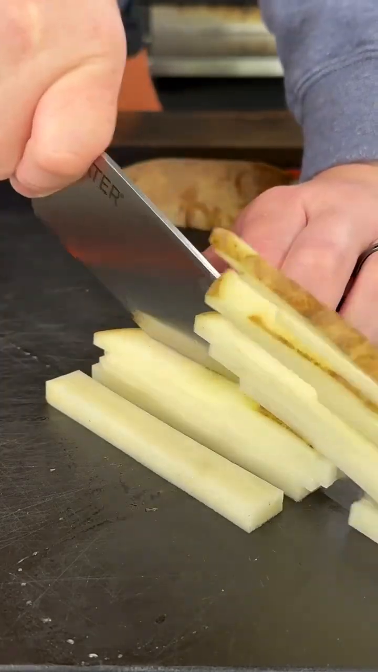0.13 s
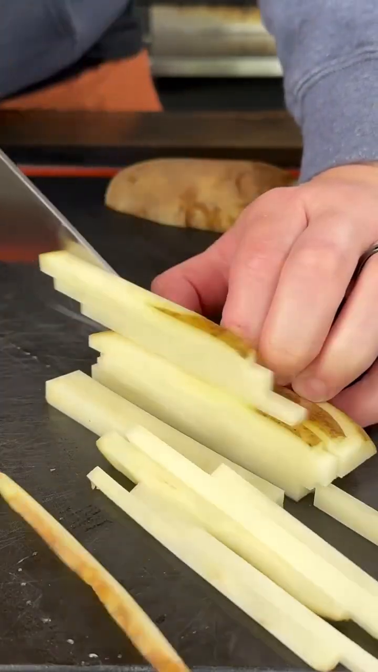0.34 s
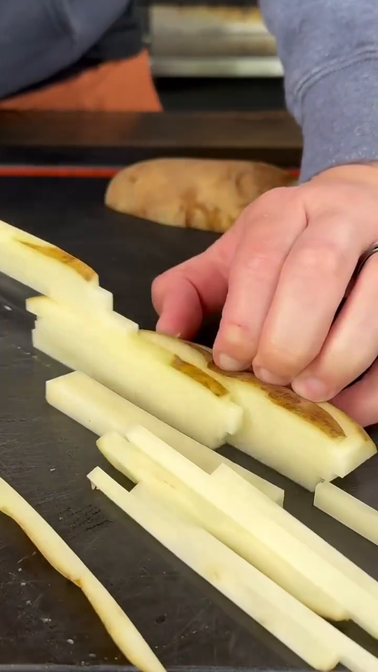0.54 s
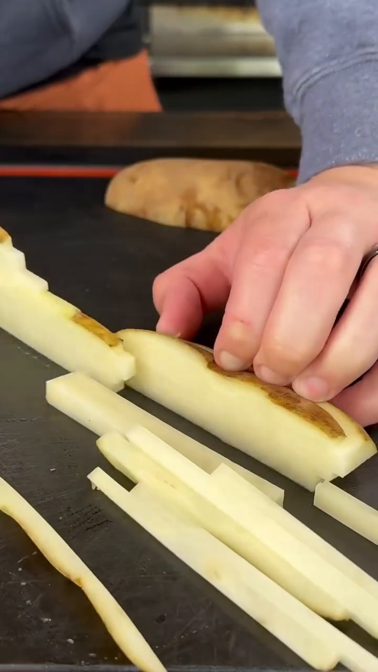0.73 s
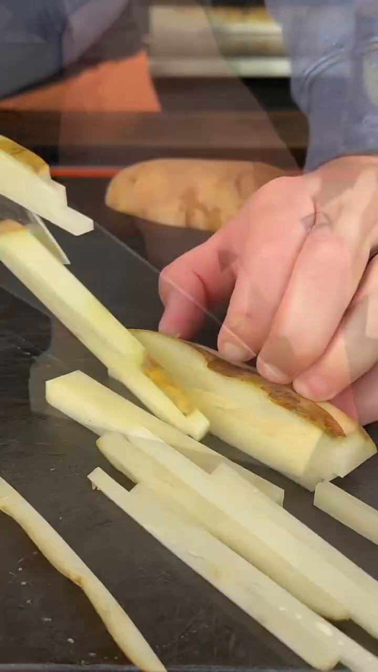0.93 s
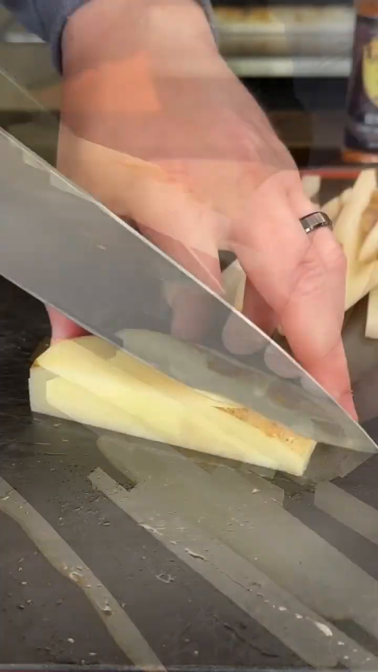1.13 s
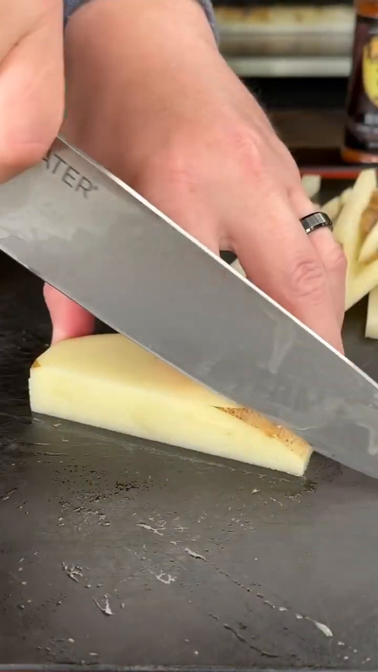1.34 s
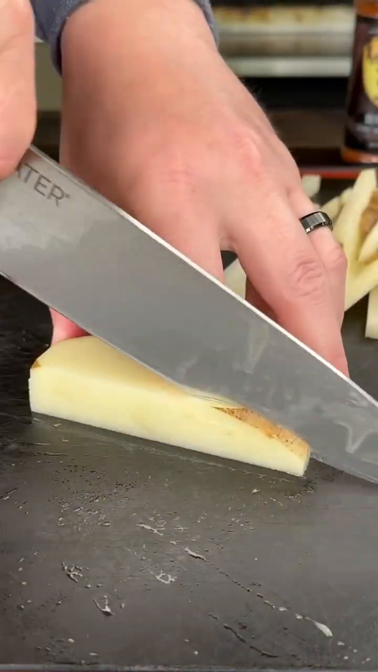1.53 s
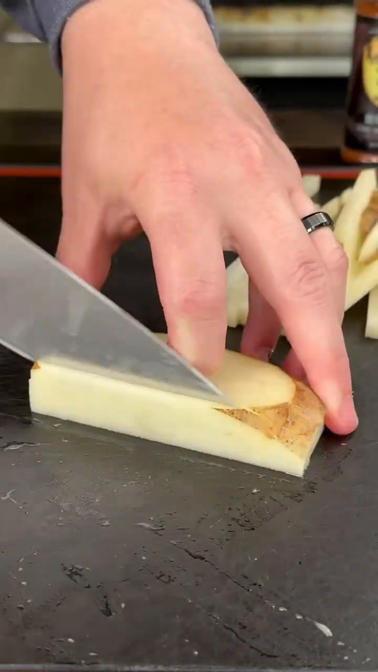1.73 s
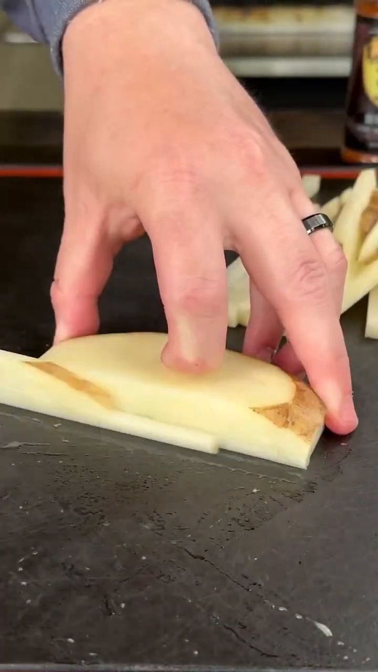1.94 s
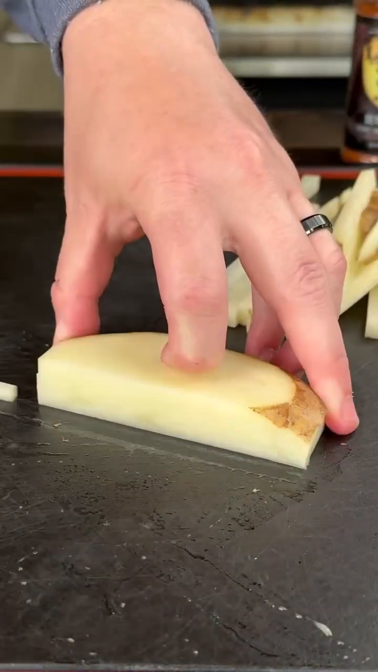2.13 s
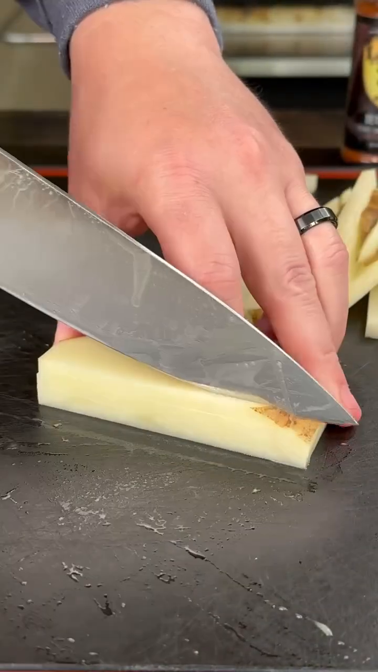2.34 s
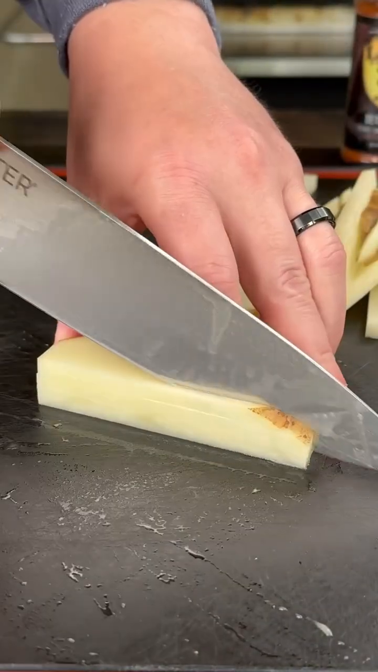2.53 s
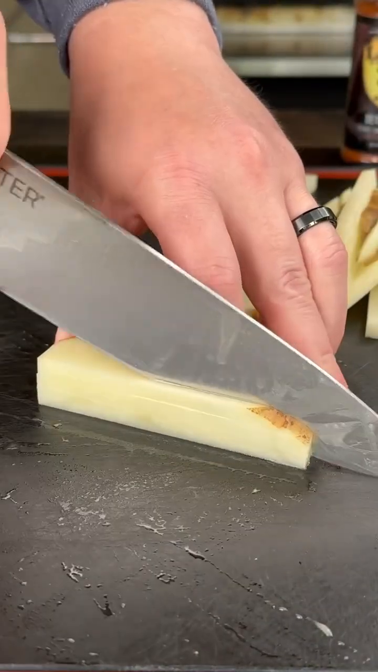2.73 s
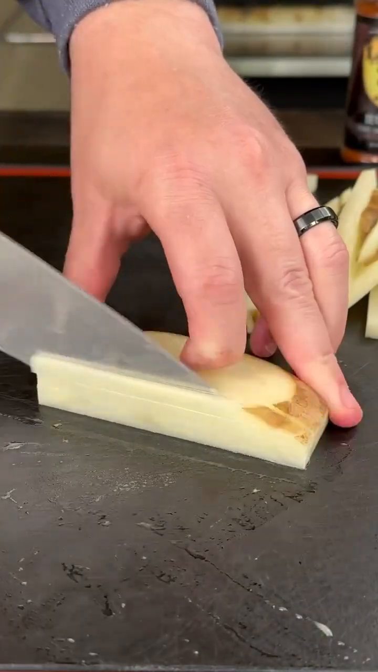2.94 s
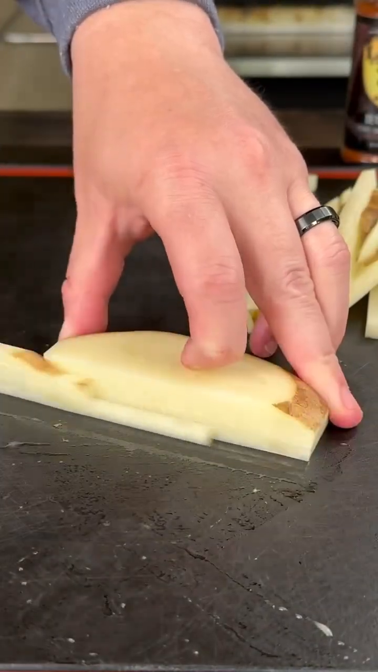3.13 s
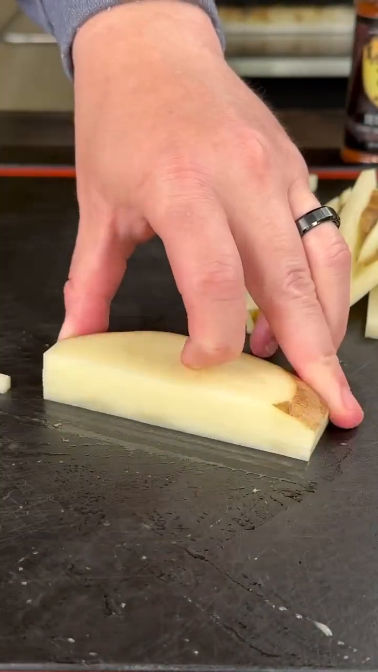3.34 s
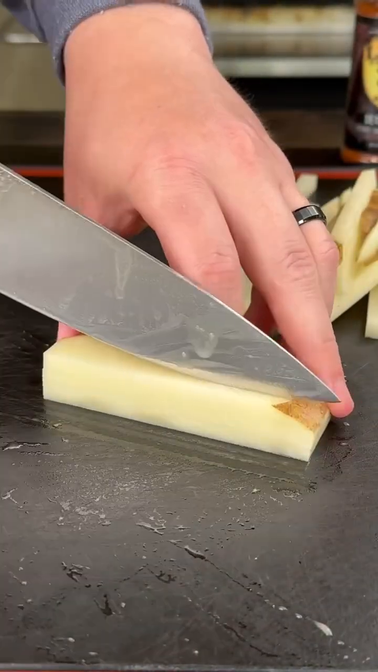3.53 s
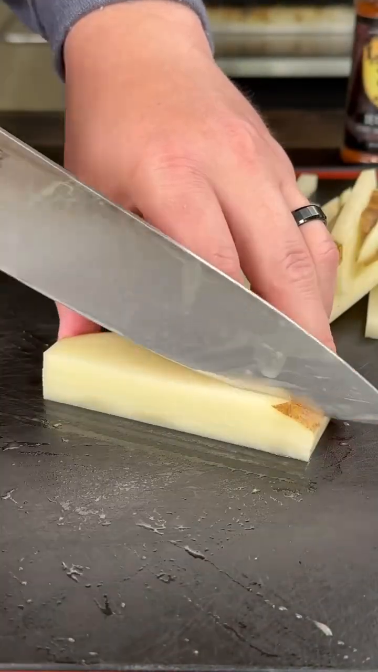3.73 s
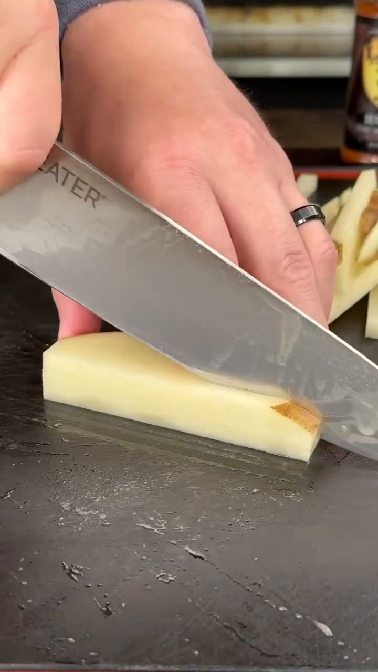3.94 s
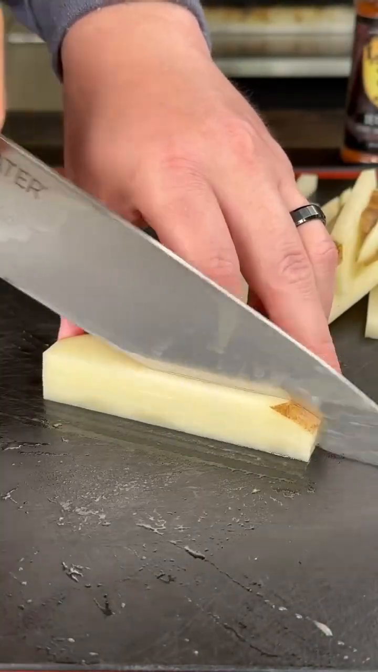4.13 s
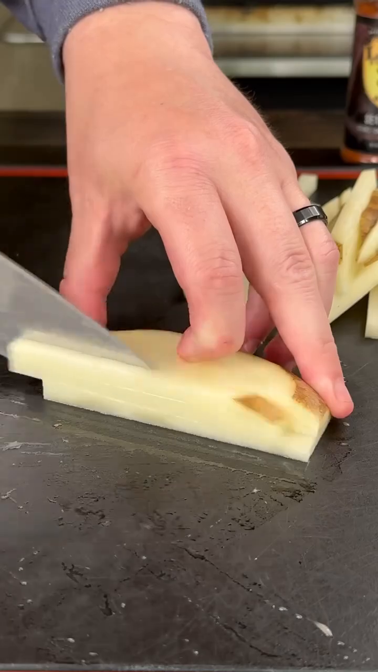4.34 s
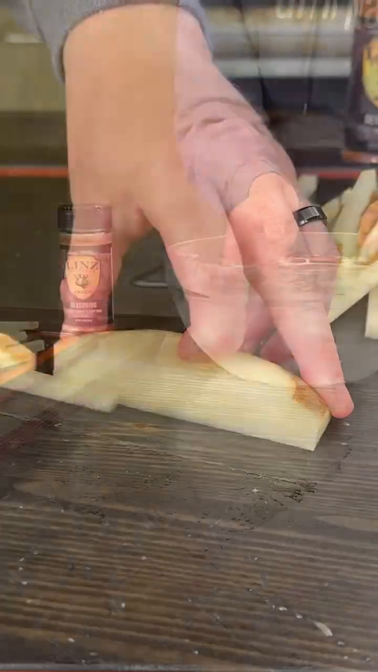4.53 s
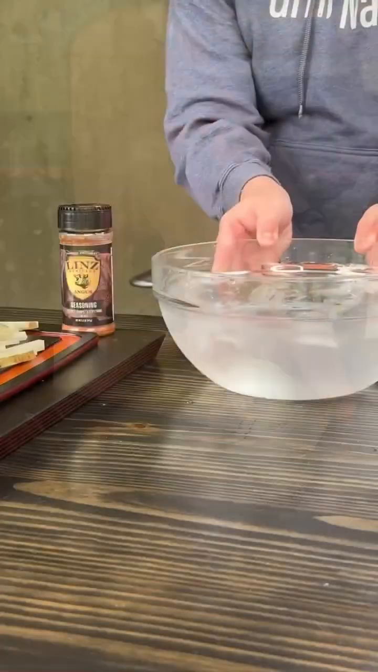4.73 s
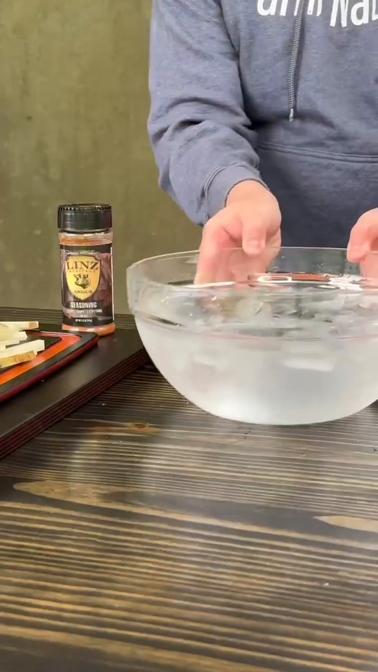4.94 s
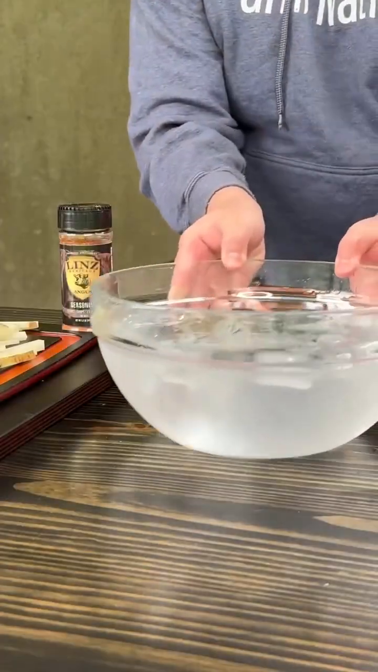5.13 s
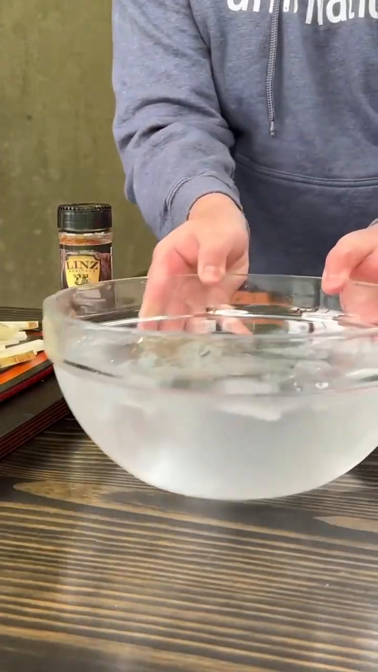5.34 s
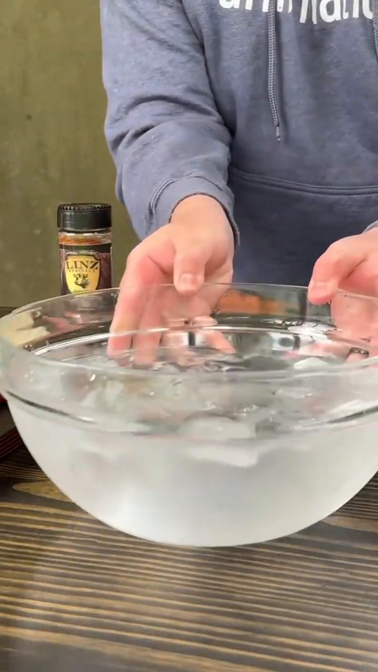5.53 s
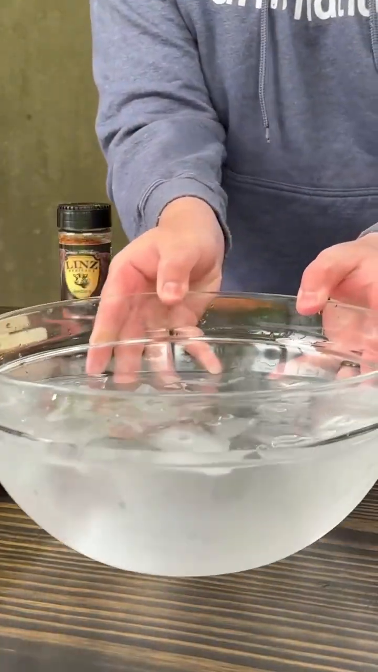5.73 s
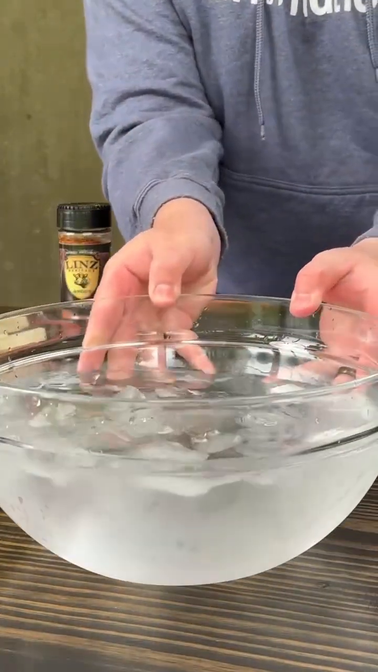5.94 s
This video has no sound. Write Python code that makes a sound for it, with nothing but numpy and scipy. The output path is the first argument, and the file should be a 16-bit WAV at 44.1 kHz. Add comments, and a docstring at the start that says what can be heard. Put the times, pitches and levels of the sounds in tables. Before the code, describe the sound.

Close, nearly centred sound outdoors over a soft low rumble. A large knife draws through raw potato in wet, crisp hissing strokes, its edge knocking hard on a plastic board, the blade faintly singing late in the later strokes. Small birds whistle and trill in the distance. Then a heavy glass bowl is pushed over a wooden table with gritty scraping, low groans, judder, bumps and a faint hoarse squeal.

```python
"""A chef's knife hisses through a raw potato, wet grains tearing over a low rumble of filtered noise outdoors.
The edge knocks on a plastic board: damped sine modes, thuds and noise clicks. Late in each stroke the blade sings.
Small birds call far off: gliding sines and a trill of upward flicks. Then a glass bowl of ice water is
pushed across a wooden table: gritty scrape, rubbed resonances, groan, judder, bumps, clinks and a squeal."""
import sys
import numpy as np
from scipy import signal
from scipy.fft import rfft, irfft, next_fast_len
from scipy.io import wavfile
from scipy.ndimage import uniform_filter1d, map_coordinates

SR = 44100
rng = np.random.default_rng(int(sys.argv[2]) if len(sys.argv) > 2 else 0)


def bounce(signal):
    """Save signal as a 16-bit WAV file at the path given by the first command-line argument."""
    frames = np.transpose(np.atleast_2d(signal))
    limited = np.clip(frames, -1, 1)
    pcm = np.round(limited * 32767).astype(np.int16)
    wavfile.write(sys.argv[1], SR, pcm)


N = 268125
TIME = np.arange(N) / SR
TOUCH_TIME = TIME[:SR // 4]   # time base of one touch

# Levels in the tables are relative: the mix adds its own gains.
# Outdoor rumble and air: (frequency [Hz], density [dB/Hz])
OUTDOOR_SPECTRUM = [(13, -26), (22, -3.5), (76, 4.5), (345, -15), (481, -21.5), (857, -20), (1070, -20.5),
                    (1490, -24.5), (2070, -28), (2440, -24), (3210, -34.5), (4860, -40), (5570, -38.5),
                    (11100, -46), (15900, -51)]
OUTDOOR_DB = -48.5

# Blade drawn through potato: (start [s], end [s], tearing [dB], juice fizz [dB],
# place of fizz peak [0-1], blade singing [dB])
SLICE_STROKES = [(0.051, 0.748, -46, -49.5, 0.28, -61), (1.498, 2.232, -46.5, -49, 0.44, -57.5),
                 (2.707, 3.396, -46.5, -50.5, 0.43, -47), (4.04, 4.755, -46.5, -48.5, 0.4, -45.5)]
SLICE_ATTACK_S, SLICE_RELEASE_S = 0.098, 0.12
TEAR_RISE_DB = 2   # over a stroke, as the flesh grips harder
FIZZ_LOSS_DB = 7.5   # half a stroke from its peak
# Edge set on the potato and pressed in, or sliding clear: (start [s], end [s], level [dB], juice fizz [dB])
LIGHT_CONTACTS = [(-.03, 0.066, -44.5, -73), (0.883, 1.098, -52, -64), (1.065, 1.413, -52, -59.5),
                  (2.18, 2.272, -45, -57), (2.32, 2.609, -54, -57), (2.688, 2.746, -68, -50),
                  (3.323, 3.43, -43.5, -55), (3.41, 3.64, -89, -75), (3.653, 3.99, -65, -59.5)]
PRESS_ATTACK_S, PRESS_RELEASE_S, PRESS_RISE_DB, PRESS_DRAG_DB = 0.03, 0.053, 7.5, -2
# Drag on the flat of the blade: (level [dB], place of peak [0-1], loss half a stroke away [dB])
BLADE_DRAG = (-2.5, 0.29, 11)
# Wet flesh parting: (frequency [Hz], density [dB/Hz])
FLESH_SPECTRUM = [(210, -63), (350, -9), (417, -12), (593, -3), (741, -6.5), (880, -1), (1160, -6.5),
                  (1700, 2.5), (2660, 4), (3540, -4.5), (4150, 1.5), (4900, -6.5), (5700, -4),
                  (9830, -10.5), (11700, -6), (15900, -15)]
# Rubbed blade resonances: (frequency [Hz], width [Hz], level [dB], place of peak in stroke [0-1])
BLADE_RESONANCES = [(1720, 110, -4, .6), (2210, 160, -8.5, .7), (2726, 99, -2.5, .69),
                    (4016, 140, -0.5, 0.8), (5520, 260, -11, .72)]
BLADE_GLIDE_PER_STROKE, SING_SPAN_STROKES = 0.2, 0.086   # fraction of pitch, fraction of stroke
# Passing resonances of a moving contact: size and pace
SHIFT_WIDTH_HZ, SHIFTS_PER_S = 248.2, 7

# Bird notes: (time [s], length [s], first pitch [Hz], last pitch [Hz], arch [Hz], level [dB])
BIRD_NOTES = [(0.036, 0.062, 3720, 3670, -7, -45.5), (0.9, 0.059, 2395, 2430, 0, -56),
              (0.924, 0.097, 3050, 3330, -130, -53), (1.247, 0.36, 2700, 2480, -59.5, -61.5),
              (1.803, .04, 3040, 3200, 0, -50), (1.877, 0.064, 3350, 2990, 0, -48),
              (2.247, 0.051, 3164, 2730, 58, -46), (2.578, 0.1, 3350, 3000, -58, -51),
              (2.678, 0.049, 2640, 2510, 40, -51), (3.39, 0.079, 2830, 2830, 3, -58),
              (5.712, 0.12, 5650, 5700, 523, -65), (5.959, 0.11, 5600, 5280, 564, -63.5)]
# Trill: quick upward flicks, each held at its top, sinking a little in pitch
TRILL_START_S, TRILL_PERIOD_S, TRILL_LENGTH_S, TRILL_DB = 0.772, 0.0752, 0.495, -57
TRILL_TOP_HZ, TRILL_SAG_HZ_PER_S = 4920, 380
FLICK_S, FLICK_DEPTH = 0.021, 0.24   # depth as a fraction of pitch
WAVER_HZ, WAVER_DEPTH = 220, 0.76

# Edge meets board: (time [s], level [dB], knock reference pitch [Hz], first tick [dB],
# delay until full edge lands [s], hardness [dB/octave], ring length factor, thud [dB])
BOARD_CHOPS = [(0.275, -15, 1270, -5.5, 0.0027, 5, 1, -8.5),
               (1.003, -28.5, 640, -3.5, 0.0027, -6.5, 0.43, -7),
               (1.3115, -16.5, 590, -8, 0.00282, 4, 0.42, -6.5),
               (2.178, -13.5, 770, -9.5, 0.00171, 2, 0.55, -8.5),
               (2.566, -17, 625, -2.5, 0.0034, -0.5, 0.4, -7.5),
               (2.712, -33, 729, -10, 0.0027, 2, 0.67, -1),
               (2.7408, -23.5, 620, -6, 0.00268, -1, 0.51, -6.5),
               (3.34, -33, 1190, -7.5, 0.00176, 2.5, 0.38, -11),
               (3.949, -13, 662, -5.5, 0.0025, 5.5, 0.61, -5)]
# Board with the knife on it: (frequency [Hz], level [dB], t60 [s])
BOARD_MODES = [(253, -8.5, 0.068), (488, 3, 0.048), (616, 2.5, 0.058), (968, 4, 0.019), (1106, -4.5, 0.032),
               (1330, -6.5, 0.037), (1805, -0.5, 0.023), (2200, -7, 0.03), (2700, -13.5, 0.044),
               (3350, -12, 0.015), (4150, -13, 0.019), (6630, -21.5, 0.007)]
KNOCK_UNEVEN_DB = 1.8
THUD_RATIO, THUD_T60_S = 0.943, 0.019   # thud pitch / knock reference pitch
# Board rebounding on the table: (frequency [Hz], level [dB], t60 [s])
REBOUND_MODES = [(212.5, -4.5, 0.14), (305, 0, 0.076), (437, 5.5, .06), (550, -2, .05)]
REBOUND_DELAY_S, REBOUND_DB = 0.00785, -21

# Sliding speed of the bowl as scrape level: (time [s], level [dB])
SLIDE_CURVE = [(4.45, -55), (4.62, -42.5), (4.78, -42.5), (5.06, -36.5), (5.38, -37.5), (5.62, -44.5),
               (5.77, -50), (5.87, -66), (6.08, -69)]
# Grit under the glass foot: (frequency [Hz], density [dB/Hz])
SCRAPE_SPECTRUM = [(240, -24.5), (400, -2), (665, -9.5), (707, -7.5), (1000, -4), (1440, -10),
                   (1620, -18.5), (2240, -8.5), (4160, -31), (4770, -27.5), (6800, -35.5), (15900, -38)]
# Rubbed glass bowl: (frequency [Hz], width [Hz], level [dB])
BOWL_RESONANCES = [(662.5, 9.8, -4.5), (1440, 30, -12.5), (1750, 57, -9.5), (2198, 27, -9),
                   (2610, 200, -12.5), (3030, 280, -10), (4130, 47, -17.5), (6930, 290, -23.5)]
# Foot chatters, table groans: (middle [s], length [s], level [dB])
GROAN_SPELLS = [(4.53, 0.25, -35), (4.633, 0.084, -22), (4.701, 0.096, -20), (4.812, 0.27, -33),
                (4.986, 0.15, -32.5), (5.102, 0.31, -24), (5.259, 0.1, -25), (5.549, 0.097, -21),
                (5.682, 0.23, -30.5), (5.796, 0.1, -28.5), (5.859, 0.021, -33.5), (5.971, 0.062, -31),
                (6.067, 0.11, -31.5)]
GROAN_UNDER_SLIDE_DB = -3   # table hum that follows the scrape
# Table groan: (frequency [Hz], density [dB/Hz])
GROAN_SPECTRUM = [(76, -46), (130, -12.5), (216, 0), (259, -16), (360, -11.5), (416, -17.5), (666, -26.5),
                  (700, -38), (910, -83), (1540, -120)]
# Table judder level: (time [s], level [dB])
JUDDER_CURVE = [(4.42, -55), (4.5, -32.5), (4.76, -38.5), (5.0, -33.5), (5.22, -41), (5.49, -38.5),
                (5.56, -27), (5.83, -19.5), (6.08, -26.5)]
# Table judder: (frequency [Hz], density [dB/Hz])
JUDDER_SPECTRUM = [(15, -57), (25, -23), (49, -8), (70, -10.5), (102, 0), (167, -13), (220, -12.5),
                   (290, -48), (480, -120)]
# Bowl catches on the grain: (time [s], level [dB])
BOWL_BUMPS = [(4.474, -34.5), (4.606, -29), (4.689, -31), (4.969, -29), (5.442, -29.5), (5.526, -18),
              (5.549, -21), (5.647, -26), (5.849, -21.5), (5.893, -31.5), (6.025, -13.5)]
# Table top: (frequency [Hz], level [dB], t60 [s])
TABLE_MODES = [(108, 6, 0.18), (222, 17, 0.033), (312, -0.5, 0.054), (360.5, 5.5, 0.051), (458, 0.5, 0.029),
               (580, -0.5, 0.055)]
TAP_DB, TAP_T60_S = -19.5, 0.027   # hard glass foot taps as it catches
# Hoarse squeal of the slowing foot: (start [s], end [s], level [dB], place of peak [0-1],
# loss half its length away [dB])
FOOT_SQUEAL = (5.5, 5.98, -44.5, .2, 18)
SQUEAL_HZ, SQUEAL_WIDTH_HZ = 2850, 250
# Glass jolted into ringing: (time [s], level [dB])
GLASS_CLINKS = [(5.527, -51.5), (6.026, -59)]
# Glass ring: (frequency [Hz], level [dB], t60 [s])
GLASS_MODES = [(1530, -5, 0.61), (2340, -17, .5), (2850, -10.5, .6)]

# Bands where the two sides differ: (low [Hz], high [Hz], difference [dB])
SIDE_BANDS = [(30, 150, -36.5), (414, 920, -8.5), (6310, 7900, -2.5), (13420, 13800, 1.5)]
CUTOFF_HZ = 15900


def from_db(db):
    """Decibels to gain."""
    return 10 ** (np.asarray(db) / 20)


def rms_one(x):
    """Scale to unit power."""
    return x / np.sqrt(np.mean(x ** 2) + 1e-20)


def cut(x, hz, kind, order=2):
    """Butterworth filter."""
    sos = signal.butter(order, np.clip(hz, 10, 0.45 * SR), kind, fs=SR, output="sos")
    return signal.sosfilt(sos, x + 1e-18)


def colour(x, spectrum):
    """Shape a steady excitation to a spectrum, falling 36 dB/octave beyond its ends; rms 1."""
    hz, db = np.transpose(spectrum)
    size = next_fast_len(N)
    f = np.maximum(np.fft.rfftfreq(size, 1 / SR), 1)
    octaves_beyond = np.abs(np.log2(f / np.clip(f, hz[0], hz[-1])))
    gain = from_db(np.interp(np.log(f), np.log(hz), db) - 36 * octaves_beyond)
    return rms_one(irfft(rfft(x, size) * gain, size)[:N])


def noise():
    """White noise."""
    return rng.standard_normal(N)


def touch_noise(t60_s):
    """Decaying noise of one touch."""
    return rng.standard_normal(len(TOUCH_TIME)) * from_db(-60 * TOUCH_TIME / t60_s)


def drift(hz):
    """Slow random wander, rms 1; the filter settles for one second first."""
    return rms_one(cut(rng.standard_normal(N + SR), hz, "low")[SR:])


def grains(per_s, spread_db):
    """Random tiny snaps of uneven size; rms 1."""
    snaps = rng.random(N) < per_s / SR
    size_db = spread_db * np.minimum(rng.exponential(1, N), 4)
    return rms_one(snaps * noise() * from_db(size_db))


def resonate(x, hz, width_hz):
    """One resonance under steady rubbing, a two-pole filter; rms 1."""
    r = np.exp(-np.pi * width_hz / SR)
    return rms_one(signal.lfilter([1, 0, -1], [1, -2 * r * np.cos(2 * np.pi * hz / SR), r * r], x))


def gliding(hz, width_hz):
    """A rubbed resonance along a pitch curve: two noise-modulated quadrature carriers."""
    phase = 2 * np.pi * np.cumsum(hz) / SR
    return drift(width_hz / 2) * np.cos(phase) + drift(width_hz / 2) * np.sin(phase)


def even(x, window_s):
    """Steady pressure holds a vibration's swing nearly constant."""
    power = np.abs(uniform_filter1d(x * x, max(int(window_s * SR), 2)))
    return x / np.sqrt(power + 1e-6)


def shifting(x, patchy_db, rise_hz_per_s):
    """As the contact moves, narrow resonances come and go and glide upward; rms 1."""
    hz, s, spectra = signal.stft(x, SR, nperseg=1024)
    place = np.broadcast_arrays((hz[:, None] - rise_hz_per_s * s) / SHIFT_WIDTH_HZ, s * SHIFTS_PER_S)
    patches = map_coordinates(rng.standard_normal((128, 128)), place, order=2, mode="grid-wrap")
    return rms_one(signal.istft(spectra * from_db(patchy_db * patches), SR)[1][:N])


def struck(modes, detune, uneven_db, hardness_db=0, length=1):
    """Modal ring of one touch: the spot varies each mode, hardness tilts toward the high ones."""
    hz, db, t60_s = np.transpose(modes)[:, :, None]
    pitch, strength = rng.standard_normal((2, len(modes), 1))
    level_db = db + uneven_db * strength + hardness_db * np.log2(hz / hz.mean())
    decay_db = 60 * TOUCH_TIME / (t60_s * max(length, 0.3))
    signs = -(-1) ** np.arange(len(modes))[:, None]
    waves = np.sin(2 * np.pi * hz * (1 + detune * pitch) * TOUCH_TIME)
    return np.sum(signs * from_db(level_db - decay_db) * waves, axis=0)


def add(out, s, sound, peak_db):
    """Place a sound at a time and a peak level."""
    at = int(np.clip(s * SR, 0, N - 1))
    out[at:at + len(sound)] += (from_db(peak_db) * sound / np.abs(sound).max())[:N - at]


def curve(rows):
    """Level curve as gain, at -120 dB before it begins."""
    s, db = np.transpose(rows)
    return from_db(np.interp(TIME, s, db, left=-120))


def stroke(start_s, end_s, attack_s, release_s):
    """Force envelope of one movement, and its progress 0-1."""
    up = np.clip((TIME - start_s) / attack_s, 0, 1)
    down = np.clip((end_s - TIME) / release_s, 0, 1)
    force = np.sin(np.pi / 2 * up) ** 2 * np.sin(np.pi / 2 * down) ** 2
    return force, np.clip((TIME - start_s) / (end_s - start_s), 0, 1)


def swell(progress, db, peak_at, loss_db):
    """Gain that arches over a stroke."""
    return from_db(db - loss_db * np.abs(2 * (progress - peak_at)) ** 0.75)


def surroundings(x, t60_s, dull_hz):
    """Scattered echoes off nearby walls and furniture, at unit energy."""
    t = TIME[:SR // 2]
    echoes = rng.standard_normal(len(t)) * from_db(-60 * t / t60_s) * (t > 0.004)
    echoes = cut(echoes, dull_hz, "low", order=1)
    return signal.fftconvolve(x, echoes / np.linalg.norm(echoes))[:N]


def outdoors():
    """Low rumble and air: steady coloured noise."""
    return from_db(OUTDOOR_DB) * colour(noise(), OUTDOOR_SPECTRUM)


def knife_motion():
    """Strength of tearing, drag and fizz over all strokes and light contacts."""
    tearing, drag, fizz = np.zeros((3, N))
    for start_s, end_s, db, fizz_db, fizz_peak_at, _ in SLICE_STROKES:
        force, progress = stroke(start_s, end_s, SLICE_ATTACK_S, SLICE_RELEASE_S)
        tearing += force * from_db(db + TEAR_RISE_DB * (progress - 0.5))
        drag += force * from_db(db) * swell(progress, *BLADE_DRAG)
        fizz += force * swell(progress, fizz_db, fizz_peak_at, FIZZ_LOSS_DB)
    for start_s, end_s, db, fizz_db in LIGHT_CONTACTS:
        force, progress = stroke(start_s, end_s, PRESS_ATTACK_S, PRESS_RELEASE_S)
        force = force * from_db(PRESS_RISE_DB * (progress - 1.5))
        tearing += force * from_db(db)
        drag += force * from_db(db + PRESS_DRAG_DB)
        fizz += force * from_db(fizz_db)
    return tearing, drag, fizz


def slicing():
    """Cells burst by the thousand: grains split into drag, tearing and juice fizz bands."""
    tearing, drag, fizz = knife_motion()
    cells = colour(grains(9000, 1.6) + 1.46 * noise(), FLESH_SPECTRUM)
    cells = cells * from_db(0.79 * drift_33())
    cells = shifting(cells, patchy_db=3.0, rise_hz_per_s=1199)
    tear = from_db(-1.2) * rms_one(cut(cells, [1350, 6500], "band", order=3))
    rub = from_db(0.5) * rms_one(cut(cells, 1070, "low", order=4))
    juice = from_db(1.46) * rms_one(cut(cells, 8000, "high", order=4))
    return tearing * tear + drag * rub + fizz * juice


def drift_33():
    """Quick flutter of the tearing strength."""
    return drift(33)


def blade():
    """Each resonance of the gripped blade swells at its own depth of cut and rises as the blade sinks."""
    out = np.zeros(N)
    for hz, width_hz, db, peak_at in BLADE_RESONANCES:
        level, past_peak = np.zeros((2, N))
        for start_s, end_s, _, _, _, sing_db in SLICE_STROKES:
            force, progress = stroke(start_s, end_s, SLICE_ATTACK_S, SLICE_RELEASE_S)
            bell = np.exp(-((progress - peak_at) / SING_SPAN_STROKES) ** 2)
            level += force * from_db(sing_db + db) * bell
            past_peak += (progress - peak_at) * (force > 0)
        out += level * gliding(hz * (1 + BLADE_GLIDE_PER_STROKE * past_peak), width_hz)
    return out


def trill():
    """Sine flicked up to its top once a period, the top sagging."""
    t = TIME[:int(TRILL_LENGTH_S * SR)]
    in_note_s = t % TRILL_PERIOD_S
    top_hz = TRILL_TOP_HZ - TRILL_SAG_HZ_PER_S * t
    hz = top_hz * (1 - FLICK_DEPTH * np.maximum(1 - in_note_s / FLICK_S, 0))
    envelope = np.sqrt(np.abs(np.sin(np.pi * in_note_s / TRILL_PERIOD_S)))
    return envelope * np.sin(2 * np.pi * np.cumsum(hz) / SR)


def birds():
    """Distant gliding whistles and a trill, wavering in the air."""
    out = np.zeros(N)
    for s, length_s, first_hz, last_hz, arch_hz, db in BIRD_NOTES:
        u = np.linspace(0, 1, max(int(length_s * SR), 9))
        arch = np.sin(np.pi * u)
        hz = first_hz + (last_hz - first_hz) * u + arch_hz * arch
        add(out, s, np.sqrt(np.abs(arch)) * np.sin(2 * np.pi * np.cumsum(hz) / SR), db)
    add(out, TRILL_START_S, trill(), TRILL_DB)
    return out * (1 + WAVER_DEPTH * drift(WAVER_HZ)) / np.hypot(1, WAVER_DEPTH)


def chops():
    """The tip ticks on the board with a wet crack, then the whole edge lands with knock and thud, and the board
    rebounds."""
    out, t = np.zeros(N), TOUCH_TIME
    for s, db, hz, tick_db, landing_s, hardness_db, length, thud_db in BOARD_CHOPS:
        tick = cut(struck(BOARD_MODES, 0.034, 0.27, hardness_db), 910, "high")
        knock = struck(BOARD_MODES, 0.006, KNOCK_UNEVEN_DB, hardness_db, length)
        knock = cut(knock, [0.84 * hz, 1.74 * hz], "band", order=1)
        thud = np.sin(2 * np.pi * THUD_RATIO * hz * t) * from_db(-60 * t / THUD_T60_S)
        rebound = struck(REBOUND_MODES, 0.076, 5.4) * (1 - np.exp(-t / 0.005))
        crack = cut(rng.standard_normal(len(t)), [900, 9000], "band", order=1)
        crack = crack * from_db(-60 * t / 0.093) * (1 - np.exp(-t / 0.0011))
        edge_click = cut(touch_noise(0.016), 2000, "high", order=1)
        add(out, s + 0.00043, tick, db + tick_db)
        add(out, s + landing_s, knock, db - 0.5)
        add(out, s + landing_s, thud, db + thud_db)
        add(out, s + REBOUND_DELAY_S, rebound, db + REBOUND_DB)
        add(out, s + 0.00041, crack, db - 32.5)
        add(out, s + 0.0007, edge_click, db - 23)
    return out


def bowl_scrape(slide):
    """Grit scrapes under the foot and the rubbed glass sings faintly."""
    glass = sum(from_db(db) * resonate(noise(), hz, width_hz) for hz, width_hz, db in BOWL_RESONANCES)
    glass = glass * from_db(1.7 * drift(13))   # the foot grips unevenly
    grit = colour(grains(6000, 0.63) + 0.5 * noise(), SCRAPE_SPECTRUM)
    grit = shifting(grit, patchy_db=4.5, rise_hz_per_s=98)
    rubbed = from_db(-3.5) * grit + from_db(-6.5) * glass
    return slide * rubbed * from_db(1.0 * drift(32))


def table_groan(slide):
    """Chatter spells swell and die away over a hum that follows the scrape."""
    level = from_db(GROAN_UNDER_SLIDE_DB) * slide
    for s, length_s, db in GROAN_SPELLS:
        force, _ = stroke(s - length_s / 2, s + length_s / 2, 0.66 * length_s, 0.58 * length_s)
        level = level + from_db(db) * force
    hum = even(resonate(noise(), 215.1, 8.8), 0.0034)
    wood = even(from_db(3.0) * colour(noise(), GROAN_SPECTRUM) + hum, 0.041)
    wood = cut(wood, 560, "low")   # the heavy table passes on no treble
    return from_db(-1.24) * level * wood


def table_judder():
    """Stick-slip shakes the table: low noise with one narrow resonance, swing held even."""
    sway = even(resonate(noise(), 63.4, 4.8), 0.054)
    shake = even(colour(noise(), JUDDER_SPECTRUM) + 0.89 * sway, 0.082)
    shake = cut(shake, 180, "low", order=3)
    return from_db(0.5) * curve(JUDDER_CURVE) * shake


def bowl_bumps():
    """The foot catches on the grain: a noise tap and the table's modes."""
    out = np.zeros(N)
    for s, db in BOWL_BUMPS:
        tap = cut(touch_noise(TAP_T60_S), [330, 850], "band", order=3)
        add(out, s, tap, db + TAP_DB)
        add(out, s, cut(struck(TABLE_MODES, 0.015, 6.3), 550, "low", order=3), db + 3.5)
    return out


def bowl():
    """The glass foot sticks and slips across the table."""
    slide = curve(SLIDE_CURVE)
    return bowl_scrape(slide) + table_groan(slide) + table_judder() + bowl_bumps()


def glass_sounds():
    """The foot squeals hoarsely as it slows; the bowl clinks faintly at the hardest jolts."""
    start_s, end_s, db, peak_at, loss_db = FOOT_SQUEAL
    force, progress = stroke(start_s, end_s, 0.13, 0.05)
    squeal = gliding(SQUEAL_HZ * np.ones(N), SQUEAL_WIDTH_HZ)
    out = force * swell(progress, db, peak_at, loss_db) * squeal
    for s, clink_db in GLASS_CLINKS:
        add(out, s, struck(GLASS_MODES, 0.002, 1.5), clink_db)
    return out


def scene():
    """Nearly everything is central; the sides differ mainly in a few bands."""
    air, song, knocks = outdoors(), birds(), chops()
    work = slicing() + blade() + bowl() + glass_sounds()
    knock_echo = from_db(-17) * surroundings(knocks, 0.19, 4600)
    song_echo = from_db(-10) * surroundings(song, 0.27, 5000)
    mid = work + knocks + knock_echo + song + song_echo + air
    mid = cut(mid, 46.4, "high", order=3)   # the deepest bass falls away
    scattered = surroundings(mid, 0.041, 20000)
    side = from_db(-52.0) * scattered
    for low_hz, high_hz, db in SIDE_BANDS:
        side = side + from_db(db) * cut(scattered, [low_hz, high_hz], "band", order=3)
    side = side + from_db(-25.0) * cut(knocks, [400, 800], "band", order=1)   # knocks lean to one side
    return mid + side * np.array([[1], [-1]])


def record(dry):
    """Steep elliptic low-pass."""
    return signal.sosfilt(signal.ellip(12, 0.1, 90, CUTOFF_HZ, fs=SR, output="sos"), dry)


dry = scene()
out = record(dry)
bounce(out)
```